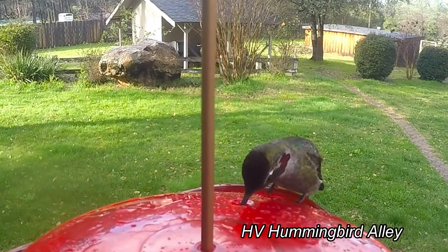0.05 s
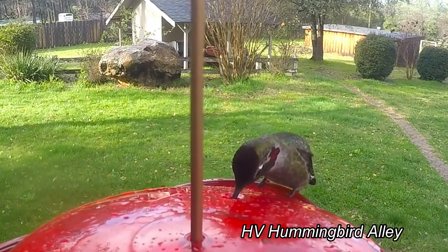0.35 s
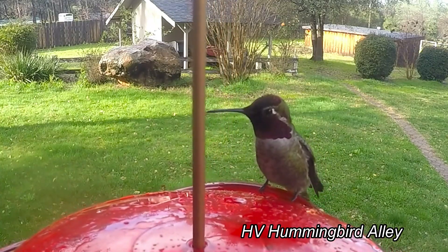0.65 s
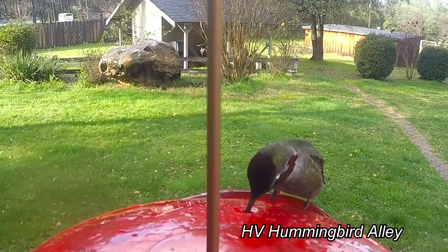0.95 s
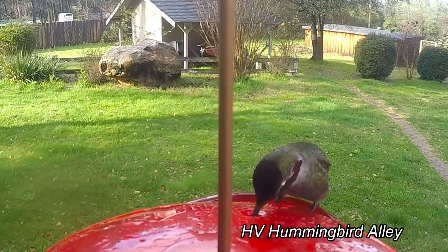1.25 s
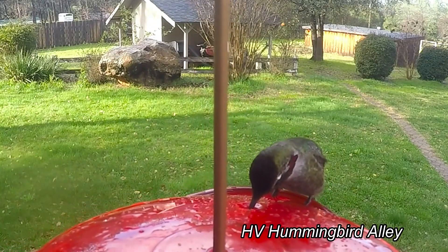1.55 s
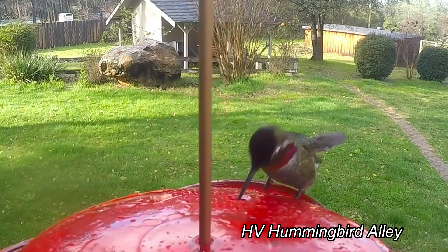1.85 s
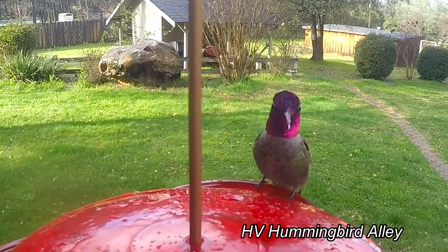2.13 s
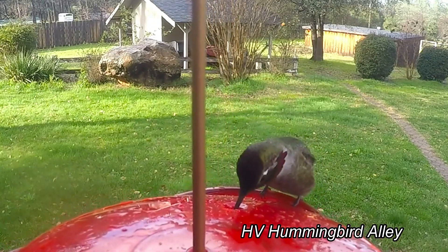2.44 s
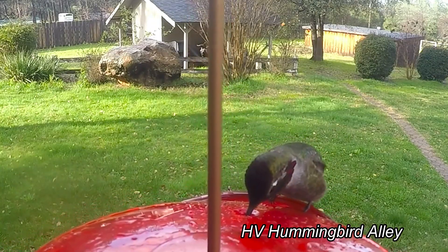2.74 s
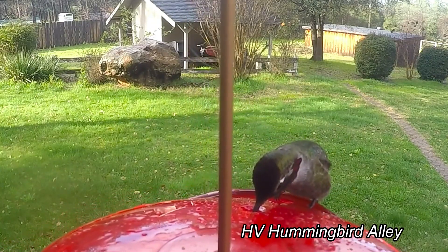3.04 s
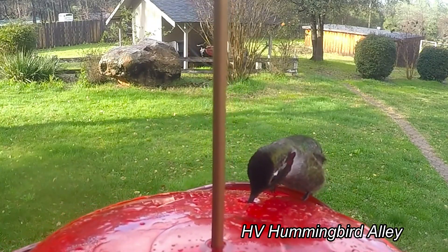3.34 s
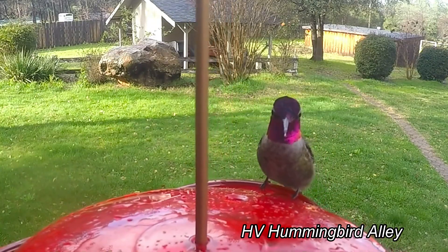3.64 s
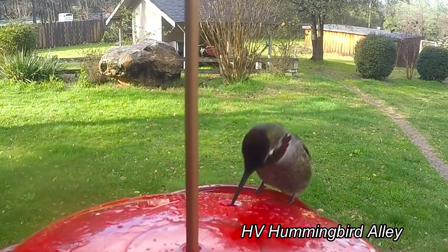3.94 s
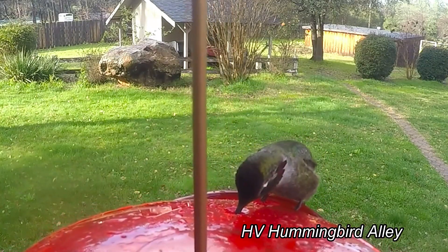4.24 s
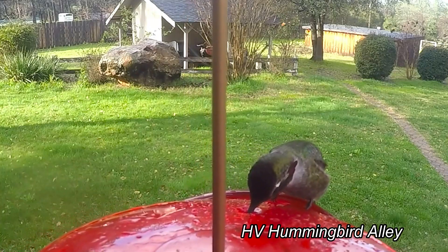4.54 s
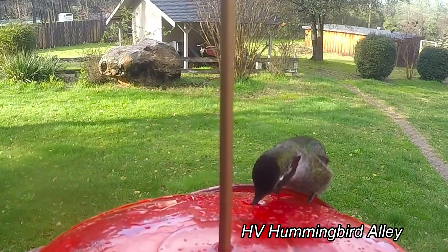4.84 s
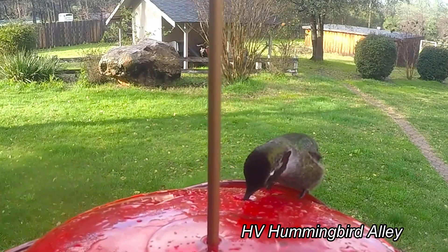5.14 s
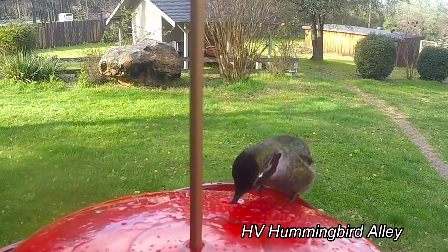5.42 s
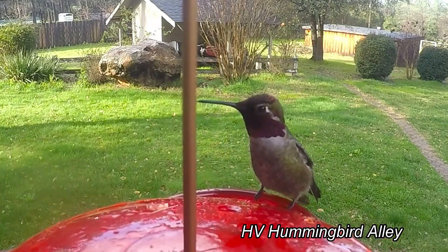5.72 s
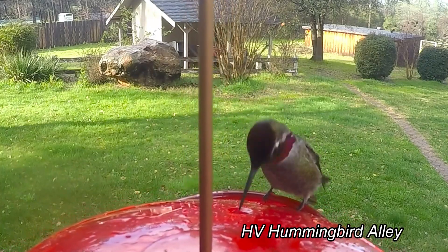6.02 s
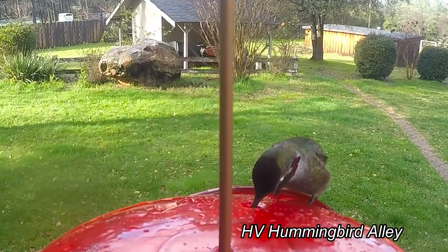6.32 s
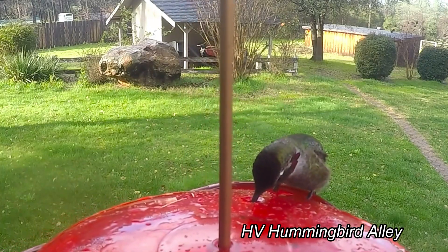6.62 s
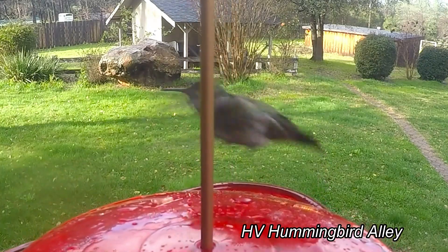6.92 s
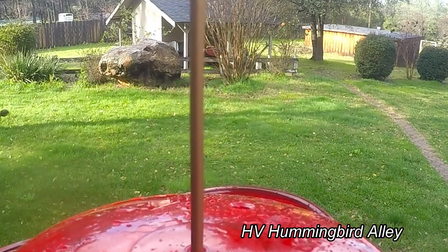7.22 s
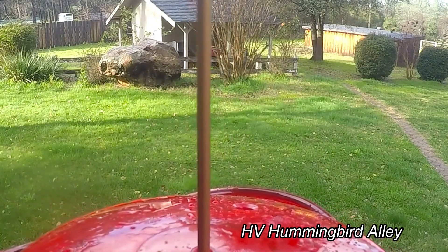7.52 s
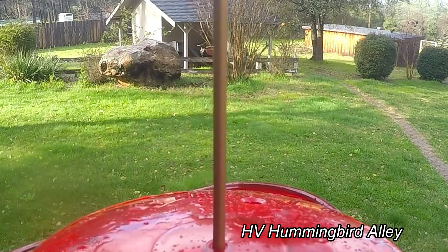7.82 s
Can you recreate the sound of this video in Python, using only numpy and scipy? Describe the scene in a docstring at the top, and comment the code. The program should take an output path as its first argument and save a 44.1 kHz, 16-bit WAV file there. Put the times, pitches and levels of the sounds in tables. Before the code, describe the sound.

A hummingbird's bill and claws tick faintly on a plastic feeder close to the microphone. Behind it are a distant engine drone, soft garden air and faint chips and thin whistles from small birds. Two puffs of air bump the microphone early on. Later, two far-off animals start yelping with an echo. Near the end the bird kicks off with a light plastic tap, whirrs close past and hovers more quietly farther away.

```python
"""A hummingbird sips at a plastic feeder close to the microphone, bill and claws ticking, then kicks
the feeder into a short ring, whirrs past and hovers a little way off. Lift on each wing stroke makes
the hum and the feathers add a swish. Behind it sits a bed of far engine drone and soft outdoor air.
Small birds chip and whistle, two puffs of air bump the microphone, and two far-off animals yelp,
one high and one low, echoing round the garden."""
import sys
import numpy as np
from scipy import signal
from scipy.fft import rfft, irfft, next_fast_len
from scipy.io import wavfile
from scipy.ndimage import uniform_filter1d

SR = 44100
rng = np.random.default_rng(int(sys.argv[2]) if len(sys.argv) > 2 else 0)


def int16_out(signal):
    """Quantize to a 16-bit WAV file."""
    q = np.round(np.clip(np.atleast_2d(signal).T, -1, 1) * 32767)
    wavfile.write(sys.argv[1], SR, q.astype(np.int16))


N = 351477
TIME = np.arange(N) / SR


def from_db(db):
    """Decibels to gain."""
    return 10 ** (np.asarray(db) / 20)


def rms_one(x):
    """Scale to unit power."""
    return x / np.sqrt(np.mean(x ** 2) + 1e-20)


def add(out, s, sound):
    """Drop a sound into the track at s seconds."""
    start = int(s * SR)
    out[start:start + len(sound)] += sound[:N - start]


def resonate(x, hz, width_hz):
    """Two-pole resonance with unity gain at its peak."""
    r = np.exp(-np.pi * width_hz / SR)
    poles = [1, -2 * r * np.cos(2 * np.pi * hz / SR), r * r]
    return signal.lfilter(np.array([1, 0, -1]) * (1 - r * r) / 2, poles, x + 1e-18)


def drift(rate_hz):
    """Smooth random modulator, rms 1."""
    hop, settle = 40, 2000
    r = np.exp(-2 * np.pi * rate_hz * hop / SR)
    slow = signal.lfilter([1], [1, -2 * r, r * r], rng.standard_normal(N // hop + settle + 2))[settle:]
    return np.interp(np.arange(N) / hop, np.arange(len(slow)), rms_one(slow))


def coloured_noise(spectrum):
    """Noise shaped by an EQ curve, rms 1."""
    hz, db = np.transpose(spectrum)
    size = next_fast_len(N)
    bins = np.maximum(np.fft.rfftfreq(size, 1 / SR), 1)
    gain = from_db(np.interp(np.log(bins), np.log(hz), db)) * (bins > 10)
    return rms_one(irfft(rfft(rng.standard_normal(size)) * gain, size)[:N])


def scatter(x, t60_s, wet_db):
    """Garden reverb: trees and fences return a diffuse, dying tail."""
    t = np.arange(SR) / SR
    tail = rng.standard_normal(SR) * from_db(-60 * t / t60_s)
    return x + from_db(wet_db) * signal.fftconvolve(x, tail / np.linalg.norm(tail))[:N]


# The far engine's swells and ebbs: t/s, level/dB
ENGINE_FADER = [(0, -37.5), (.6, -39.5), (1.2, -44), (2.7, -47.5), (3.1, -41), (4, -47), (4.75, -54),
                (5.15, -40.5), (6.25, -38.5), (6.8, -31.5), (7.3, -41.5), (7.7, -38.5), (7.97, -39)]
# Its low resonances: f/Hz, width/Hz, relative level/dB
ENGINE_RESONANCES = [(99.9, 26, -0.5), (129.74, 13.3, -4), (183.4, 24, -20.5), (286, 86, -20.5)]

def engine(firing_hz=99.73, firing_db=-10.5, octave_db=-12, throb_db=1.5, load_tilt=0.39):
    """A lumpy, throbbing drone in a few low resonances, with a wavering firing note."""
    level_db = np.interp(TIME, *np.transpose(ENGINE_FADER))
    modes = []
    for hz, width, db in ENGINE_RESONANCES:
        band = resonate(rng.standard_normal(N), hz, width)
        modes.append(from_db(db) * rms_one(resonate(band, hz, width)))
    modes[1] *= from_db(load_tilt * (level_db - level_db.mean()))   # stands out under load
    phase = 2 * np.pi * np.cumsum(firing_hz * (1 + 0.01188 * drift(4.87))) / SR
    note = rms_one(np.sin(phase) + from_db(octave_db) * np.sin(2 * phase))
    drone = rms_one(sum(modes)) + from_db(firing_db) * note
    levelled = drone / np.sqrt(uniform_filter1d(drone ** 2, size=SR // 6))
    return levelled * from_db(level_db + throb_db * drift(8))


# Bass-heavy EQ of the outdoor air: f/Hz, relative level/dB
AIR_EQ = [(20, 1), (40, 1), (70, 2.5), (150, -6), (250, -12), (400, -13), (600, -14), (1000, -18),
          (1600, -23.5), (2500, -31.5), (4000, -35.5), (6000, -39.5), (8500, -44), (15000, -47.5)]

def air(level_db=-45.5, waver_db=0.5):
    """A soft, nearly steady bed of outdoor air."""
    return from_db(level_db + waver_db * drift(7.7)) * coloured_noise(AIR_EQ)


def snap(hz, decay_s, crack_db=-6, width_share=0.34):
    """One tiny contact: a broadband crack on top of a coloured body."""
    t = np.arange(SR // 10) / SR
    body = rms_one(resonate(rng.standard_normal(len(t)), hz, width_share * hz)) * np.exp(-t / decay_s)
    crack = rng.standard_normal(len(t)) * np.exp(-t / 0.00027)
    return body + from_db(crack_db) * crack


# Crisp bill ticks on the plastic: t/s, level/dB, centre f/Hz, decay/s
BILL_TICKS = [(0.539, -58, 7000, .003), (.892, -47.5, 4950, 0.0023), (1.3036, -41, 4650, 0.00083),
              (1.406, -50, 4650, .003), (1.71, -53, 6000, .005), (2.76, -58, 12500, .003),
              (2.7925, -42.5, 5300, .00056), (2.878, -52, 8450, 0.0053), (3.427, -52, 5960, .0015),
              (3.534, -51.5, 5930, 0.0016), (3.816, -52.5, 5200, .004), (4.585, -55, 4500, .0033),
              (4.904, -52, 5430, .0015), (5.175, -57, 9000, .002), (6.069, -56, 6000, .0026),
              (7.789, -51, 7000, 0.0018)]
# Duller claw taps: t/s, level/dB
CLAW_TAPS = [(2.187, -56.5), (2.408, -53.5), (3.474, -58), (4.003, -53.5), (4.085, -53.5)]

def bill_and_claws(tap_hz=2770, tap_decay_s=0.011, patter_per_s=30, patter_db=-64):
    """Bill and claws strike the plastic, over a faint patter that lasts until the first kick."""
    out = np.zeros(N)
    for s, db, hz, decay_s in BILL_TICKS:
        add(out, s, from_db(db) * snap(hz, decay_s))
    for s, db in CLAW_TAPS:
        add(out, s, from_db(db) * snap(tap_hz, tap_decay_s))
    perched = TIME < FOOT_KICKS[0][0]
    touches = (rng.random(N) < patter_per_s / SR) * rng.random(N) * perched
    envelope = signal.lfilter([1], [1, -np.exp(-1 / (0.0075 * SR))], touches + 1e-18)
    grain = rms_one(resonate(rng.standard_normal(N), hz=3400, width_hz=4100))
    return out + from_db(patter_db) * envelope * grain


def sipping(count=18, end_s=6, level_db=-64, spread_db=3, centre_hz=7500, spread_octaves=0.53):
    """Light ticks as the bird sips, each with its own loose timing, weight and colour."""
    out = np.zeros(N)
    for k, (jitter, weight, colour) in enumerate(rng.uniform(-0.8, 1, (count, 3)), 1):
        tick = snap(centre_hz * 2 ** (spread_octaves * colour), decay_s=0.0017)
        add(out, end_s * (k + jitter) / (count + 1), from_db(level_db + spread_db * weight) * tick)
    return out


# Small birds' chips: t/s, length/s, start f/Hz, level/dB
BIRD_CHIPS = [(0.384, .018, 4450, -58), (.915, .026, 3140, -60), (1.979, 0.044, 2850, -59),
              (2.183, 0.0093, 2500, -51.5), (2.58, .029, 3290, -60.5), (2.708, .03, 2920, -58),
              (2.897, 0.024, 2630, -57), (3.281, 0.019, 4030, -49.5), (4.235, 0.024, 3820, -52.5),
              (4.595, 0.033, 6600, -60.5), (5.953, .036, 2560, -57.5), (6.172, .024, 2670, -55.5)]

def chips(fall_share=0.086, rough_share=0.097, rasp_db=4):
    """Short raspy chips from the bushes, each sagging in pitch."""
    out, waver, rasp = np.zeros(N), drift(500), drift(200)
    for s, length, start_hz, db in BIRD_CHIPS:
        u = np.linspace(0, 1, int(length * SR))
        hz = start_hz * (1 - fall_share * u) * (1 + rough_share * waver[int(s * SR):][:len(u)])
        tone = np.sin(2 * np.pi * np.cumsum(hz) / SR)
        add(out, s, from_db(db) * np.sin(np.pi * u) * tone)
    return scatter(out * rms_one(from_db(rasp_db * rasp)), t60_s=0.28, wet_db=-10)


# Low bumps of air on the microphone: centre t/s, peak level/dB, width/s
AIR_PUFFS = [(1.850, -25.5, 0.0053), (1.972, -37.5, 0.016)]

def puffs():
    """A puff of air pulls the diaphragm one way, then pushes it back."""
    out = np.zeros(N)
    for s, db, width in AIR_PUFFS:
        u = (TIME - s) / width
        out += from_db(db) * u * np.exp((1 - u ** 2) / 2)
    return out


# Thin falling bird whistles: t/s, length/s, start f/Hz, level before trim/dB
BIRD_WHISTLES = [(2.248, 0.43, 6880, -64.5), (3.377, 0.42, 6690, -65.5), (4.897, .3, 6660, -63.5),
                 (6.109, .32, 6600, -63)]

def whistles(step_share=0.058, hook_share=0.072, buzz_share=0.019, trim_db=-5.5, flutter_db=4):
    """Three buzzy syllables step down, each held and then hooked downward, smeared by the foliage."""
    out, waver = np.zeros(N), drift(340)
    for s, length, start_hz, db in BIRD_WHISTLES:
        u = np.linspace(0, 1, int(length * SR), endpoint=False)
        syllable, progress = np.divmod(3 * u, 1)
        buzz = buzz_share * waver[int(s * SR):][:len(u)]
        hz = start_hz * (1 - step_share * syllable) * (1 - hook_share * progress ** 3 + buzz)
        tone = np.sin(2 * np.pi * np.cumsum(hz) / SR)
        add(out, s, from_db(db + trim_db) * np.sin(np.pi * progress) * tone)
    return scatter(out * rms_one(from_db(flutter_db * drift(40))), t60_s=0.76, wet_db=3)


# Two far animals' yelps: t/s, length/s, top f/Hz of the second harmonic, level/dB
ANIMAL_YELPS = [(5.132, 0.13, 643, -50.5), (5.444, 0.14, 1015, -48.5), (5.646, 0.1, 652, -48.5),
                (5.921, 0.091, 1050, -54), (5.955, 0.07, 613, -50), (6.459, 0.087, 1077, -46.5),
                (6.577, 0.13, 1075, -52), (6.605, 0.16, 650, -48), (6.974, 0.13, 964, -44),
                (7.097, .42, 968, -59), (7.667, 0.076, 1024, -35.5), (7.9, 0.061, 642, -40.5)]
# Slapback from the garden: delay/s, relative level/dB
GARDEN_ECHOES = [(0.048, -7), (.078, -14), (.108, -12), (0.191, -32)]

def yelps(arch_share=0.0594, rough_share=0.028, harmonics_db=(-21, 0, -26, -25)):
    """Arched calls whose second harmonic carries furthest; they echo round the garden."""
    out, waver = np.zeros(N), drift(77)
    for s, length, top_hz, db in ANIMAL_YELPS:
        u = np.linspace(0, 1, int(length * SR))
        arch = 1 - arch_share * (2 * u - 1) ** 2
        roughness = 1 + rough_share * np.roll(waver, -int(s * SR))[:len(u)]
        phase = 2 * np.pi * np.cumsum(top_hz / 2 * arch * roughness) / SR
        voice = sum(from_db(g) * np.sin(k * phase) for k, g in enumerate(harmonics_db, 1))
        add(out, s, from_db(db) * np.sin(np.pi * u) * voice)
    echoes = sum(from_db(db) * np.interp(TIME - delay, TIME, out) for delay, db in GARDEN_ECHOES)
    return scatter(out + echoes, t60_s=2.2, wet_db=-11)


# The feet shove off the feeder: t/s, level/dB, rim boost/dB
FOOT_KICKS = [(6.900, -43.5, -10), (6.942, -46, 12.5)]
# The feeder's plastic ring: f/Hz, relative level/dB, t60/s
FEEDER_MODES = [(534, 5.5, 0.1), (945, -17, 0.08), (2970, -8.5, 0.091), (3505, -17, 0.055),
                (4170, -14, .04), (8550, -30, .04)]

def feeder_kicks(rim_hz=1780, rim_db=-12, rim_t60_s=0.067, scratch_db=-11, scratch_s=0.002):
    """Each shove of the feet scratches the plastic and sets it ringing; the last one catches the rim."""
    out, t = np.zeros(N), np.arange(SR // 4) / SR
    for s, db, boost_db in FOOT_KICKS:
        modes = list(FEEDER_MODES) + [(rim_hz, rim_db + boost_db, rim_t60_s)]
        ring = sum(from_db(g - 60 * t / t60) * np.sin(2 * np.pi * hz * t) for hz, g, t60 in modes)
        scratch = from_db(scratch_db) * rng.standard_normal(len(t)) * np.exp(-t / scratch_s)
        add(out, s, from_db(db) * (ring + scratch))
    return out


# Harmonics of the wing hum: multiple of the wingbeat, relative level/dB
HUM_HARMONICS = [(1, 4.5), (2, 2.5), (3, -13.5), (4, -8), (5, -20), (6, -21.5), (7, -27), (8, -35),
                 (9, -41), (10, -20)]

def wing_hum(phase, flown_s, nearness, closest_db=-23, attack_s=0.015, sway_db=5, near_falloff=0.64):
    """Lift on the down- and upstroke makes the hum, which sways as the bird hovers."""
    harmonics = {k: -from_db(db) * np.sin(k * phase) for k, db in HUM_HARMONICS}
    far = harmonics[2] + harmonics[4]   # only the stroke rate and its octave carry far
    near = sum(harmonics.values()) - far
    sway = from_db(sway_db * (1 - nearness) ** 2 * drift(31))
    hum = (far * sway + near * nearness ** near_falloff) / np.std(far + near)
    fade_in = np.clip(flown_s / attack_s, 0, 1)
    return from_db(closest_db) * nearness * fade_in * hum


# EQ of the feather swish: f/Hz, relative level/dB
SWISH_EQ = [(100, -8), (300, 13), (600, 2.5), (1200, -9), (2200, -6.5), (4000, -9.5), (7500, -15.5),
            (10000, -22.5), (15000, -22)]

def feather_swish(phase, flown_s, nearness, level_db=-44.5, falloff=0.96, lead_rad=0.7, uneven_db=1.5):
    """The feathers swish once on each stroke during the effort of take-off."""
    pulses = np.exp(0.63 * np.cos(2 * (phase + lead_rad)))
    strokes = pulses * (1 + 0.046 * np.cos(phase))   # down- and upstroke differ slightly
    flutter = rms_one(strokes * from_db(uneven_db * drift(70)))
    attack_s, hold_s, release_s = 0.09, 0.27, 0.093
    effort = np.interp(flown_s, np.cumsum([0, attack_s, hold_s, release_s]), [0, 1, 1, 0])
    return from_db(level_db) * nearness ** falloff * effort * flutter * coloured_noise(SWISH_EQ)


def flight(takeoff_s=6.925, first_stroke_s=6.947, pass_s=7.008):
    """The bird leaves the rim with a quickening wingbeat, passes the microphone and stops to hover."""
    closest_m, hover_m, speed_m_per_s = 0.069, 0.42, 1.5
    start_hz, steady_hz, quicken_s = 44.34, 49.25, 0.064
    flown_s = TIME - takeoff_s
    distance_m = np.minimum(np.hypot(closest_m, speed_m_per_s * (TIME - pass_s)), hover_m)
    nearness = closest_m / distance_m
    waver = 1 + 0.015 * (1 - nearness) * drift(11.6)
    beat_hz = np.interp(flown_s, [0, quicken_s], [start_hz, steady_hz]) * waver
    phase = 2 * np.pi * np.cumsum(beat_hz) / SR
    phase -= np.interp(first_stroke_s, TIME, phase)
    return wing_hum(phase, flown_s, nearness) + feather_swish(phase, flown_s, nearness)


def scene():
    """Mono mix: the hummingbird up front, the garden behind."""
    hummingbird = flight() + feeder_kicks() + bill_and_claws() + sipping()
    garden = chips() + whistles() + yelps() + engine() + air()
    return (hummingbird + garden + puffs())[None]


def record(dry):
    """A steep low-pass takes off the very top."""
    cutoff_hz = 15400
    return signal.sosfilt(signal.ellip(12, 0.1, 80, cutoff_hz, fs=SR, output="sos"), dry)


dry = scene()
out = record(dry)
int16_out(out)
```